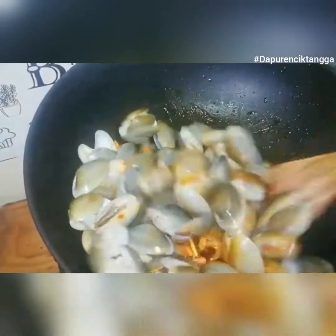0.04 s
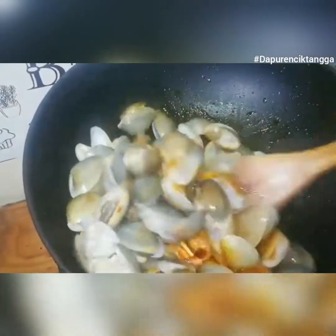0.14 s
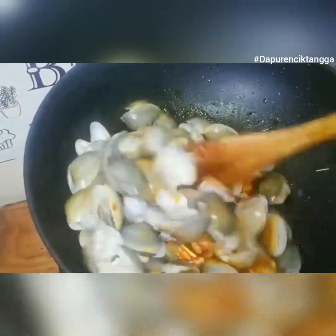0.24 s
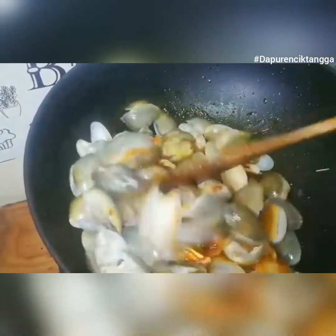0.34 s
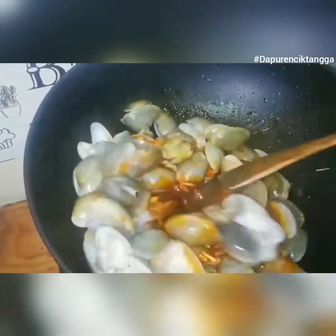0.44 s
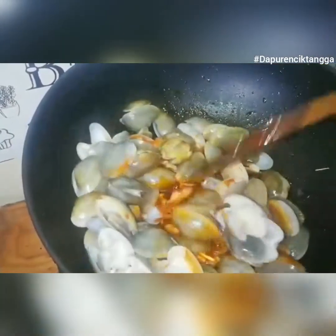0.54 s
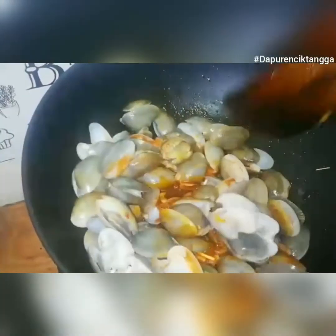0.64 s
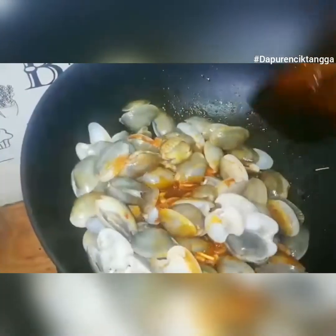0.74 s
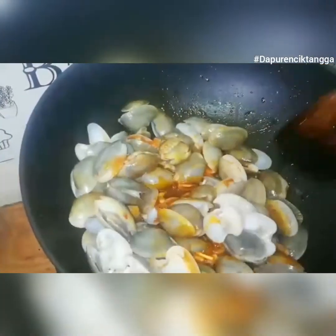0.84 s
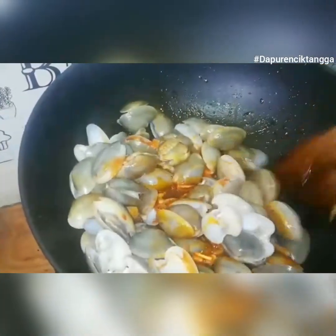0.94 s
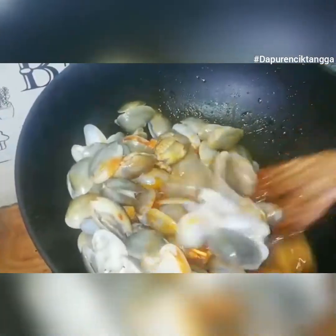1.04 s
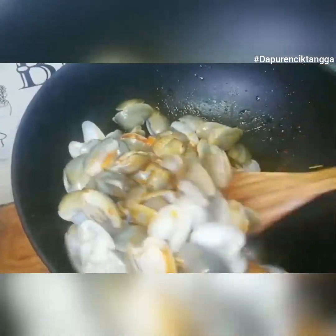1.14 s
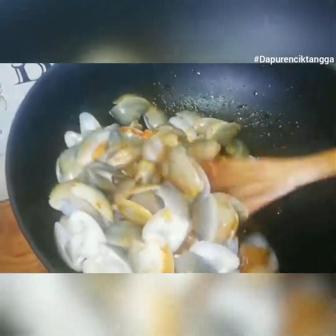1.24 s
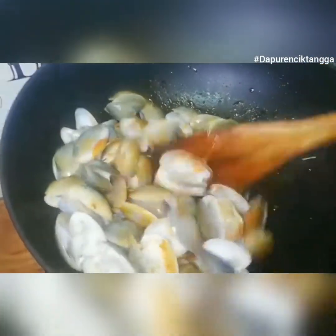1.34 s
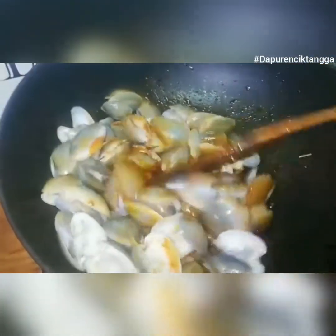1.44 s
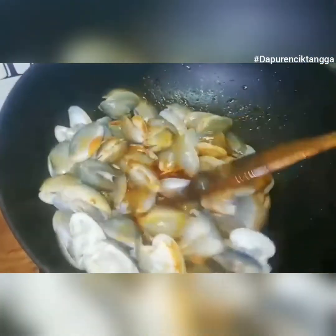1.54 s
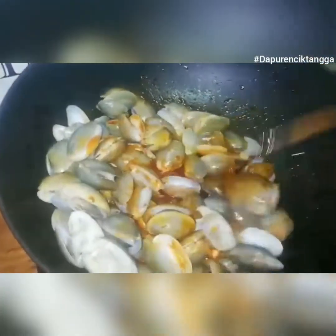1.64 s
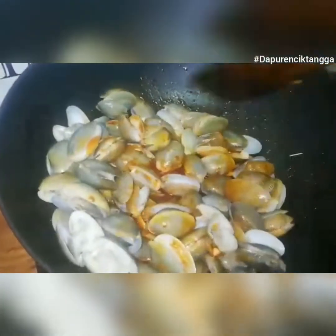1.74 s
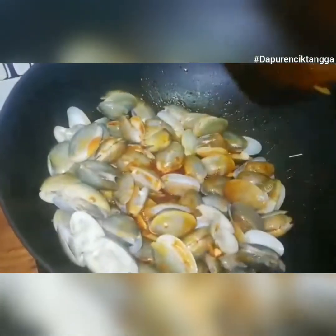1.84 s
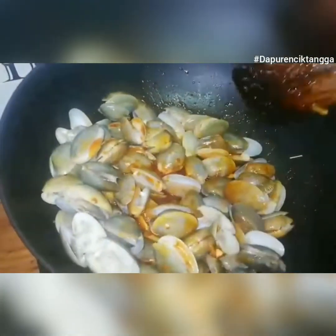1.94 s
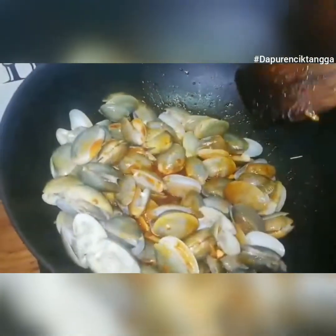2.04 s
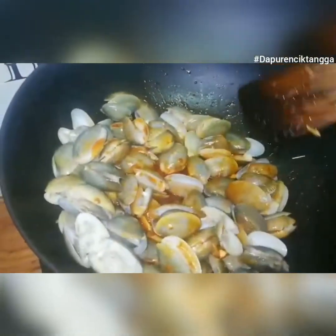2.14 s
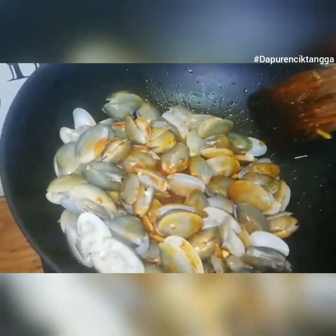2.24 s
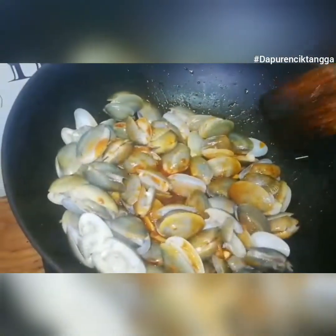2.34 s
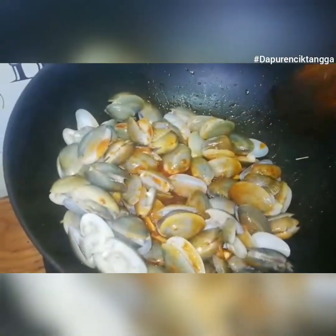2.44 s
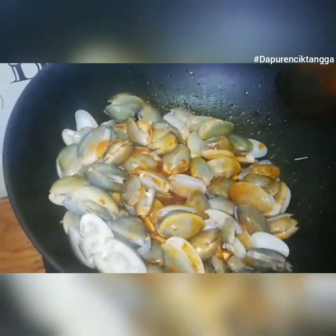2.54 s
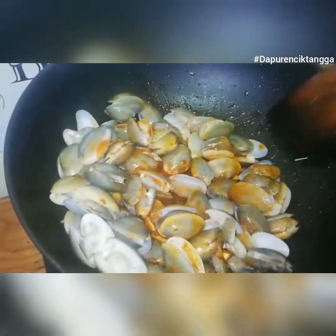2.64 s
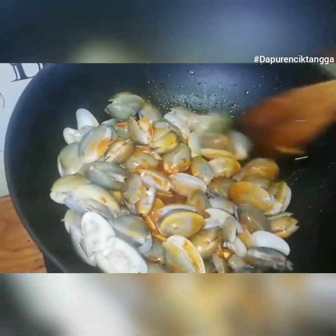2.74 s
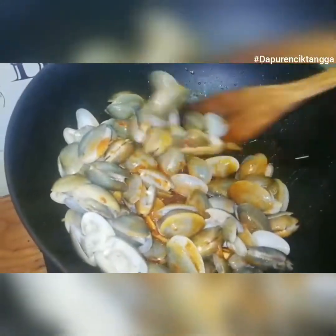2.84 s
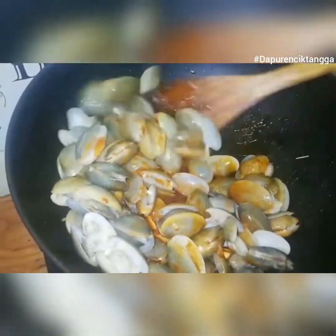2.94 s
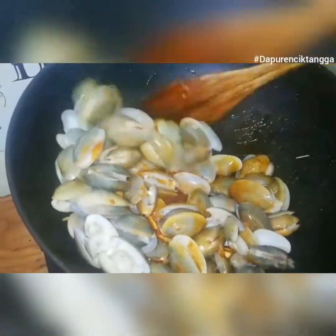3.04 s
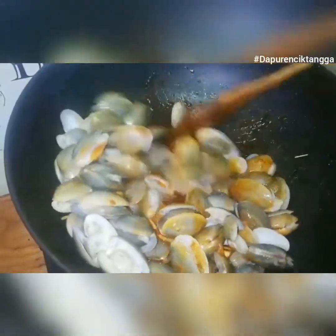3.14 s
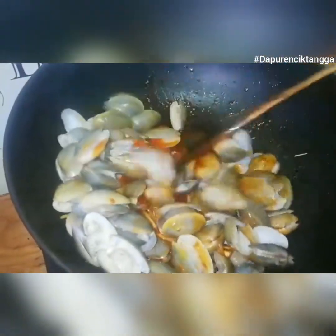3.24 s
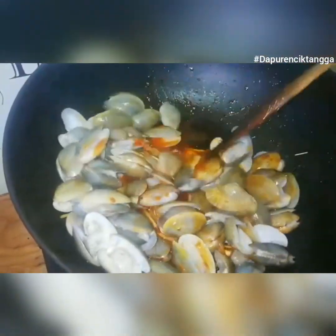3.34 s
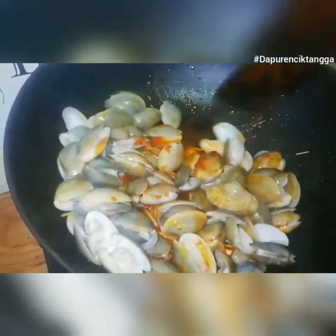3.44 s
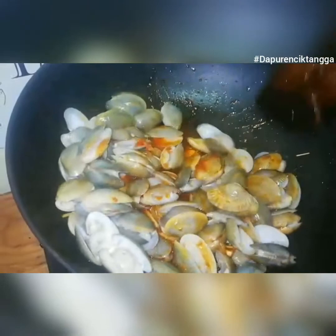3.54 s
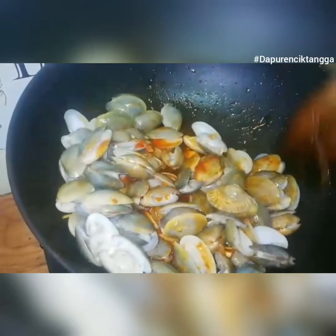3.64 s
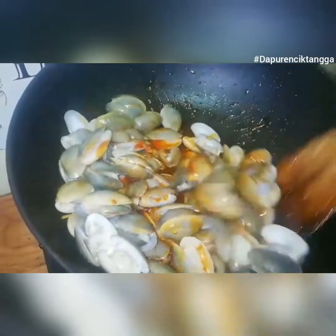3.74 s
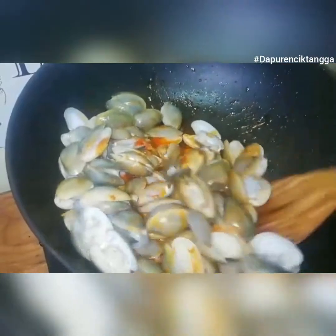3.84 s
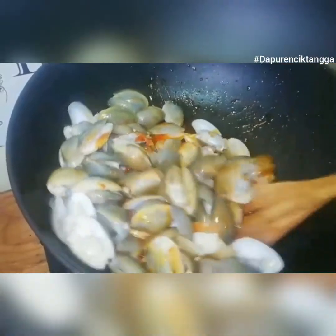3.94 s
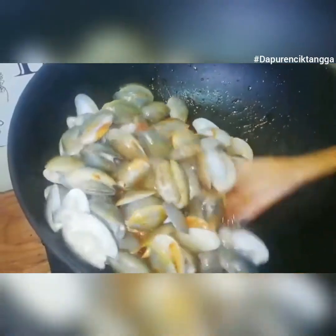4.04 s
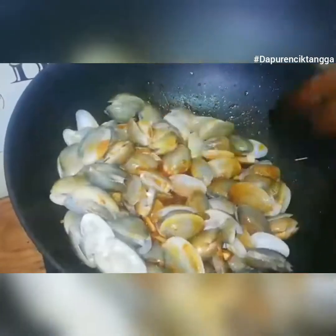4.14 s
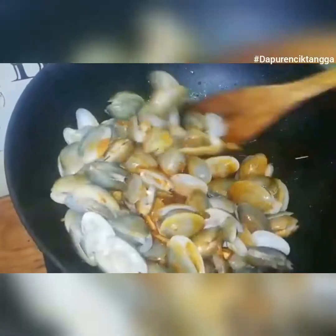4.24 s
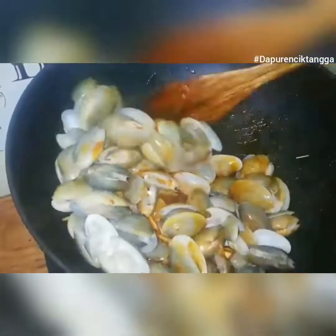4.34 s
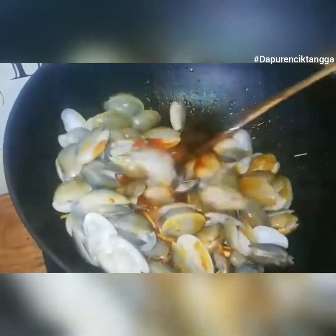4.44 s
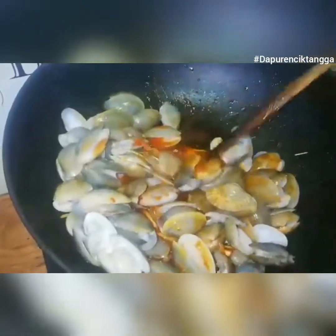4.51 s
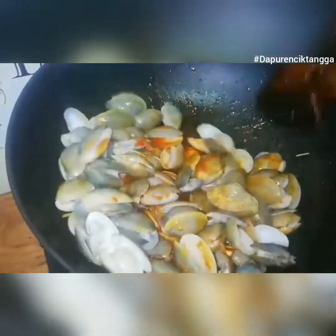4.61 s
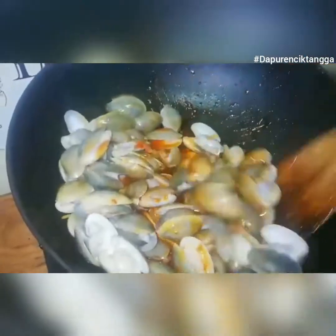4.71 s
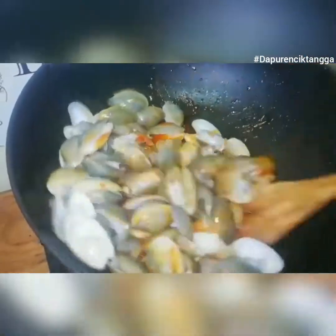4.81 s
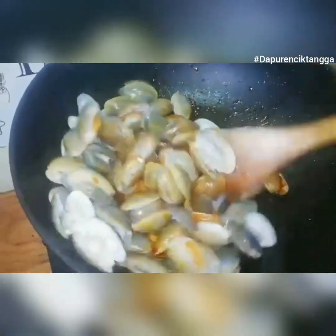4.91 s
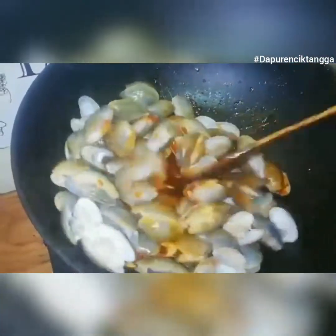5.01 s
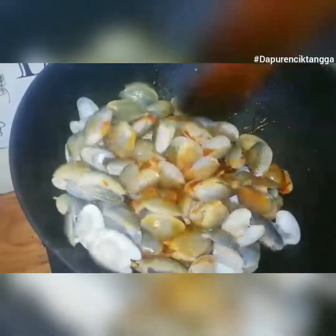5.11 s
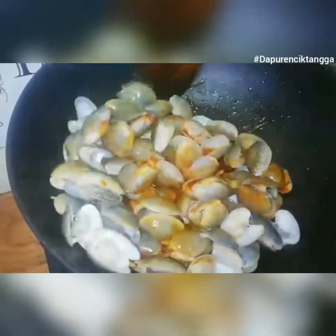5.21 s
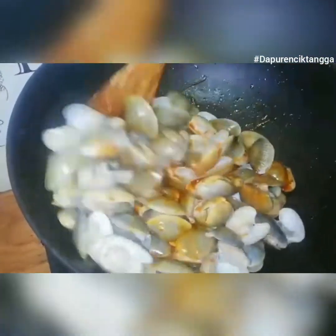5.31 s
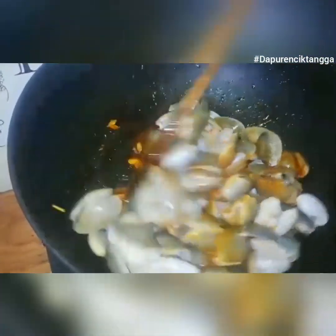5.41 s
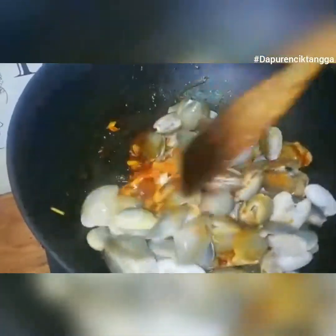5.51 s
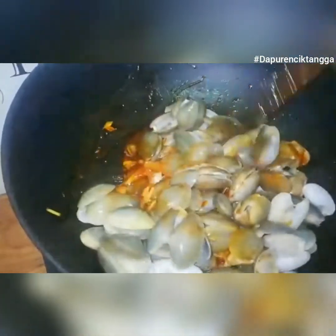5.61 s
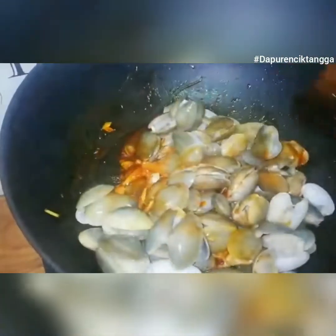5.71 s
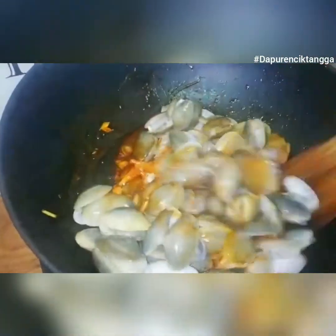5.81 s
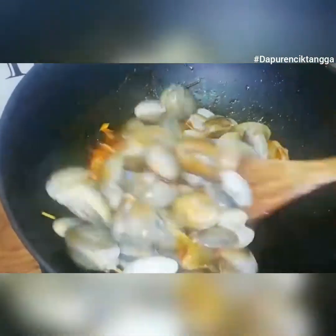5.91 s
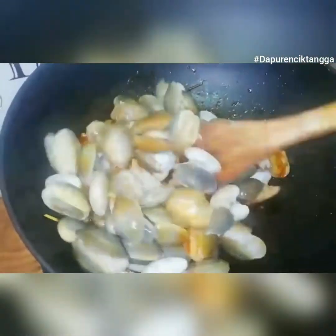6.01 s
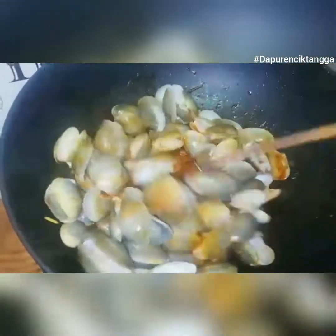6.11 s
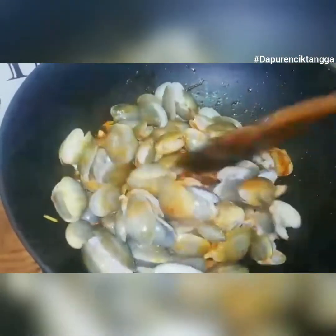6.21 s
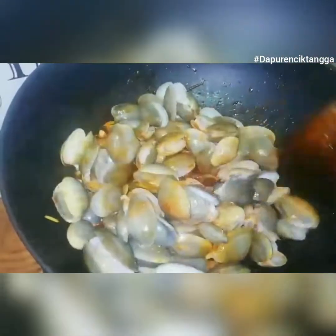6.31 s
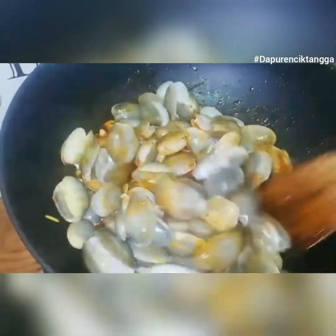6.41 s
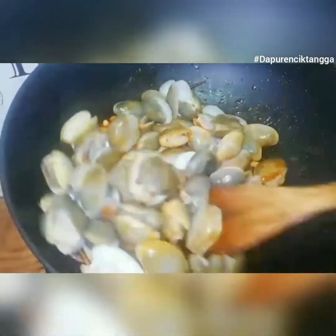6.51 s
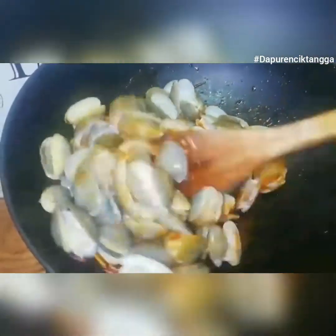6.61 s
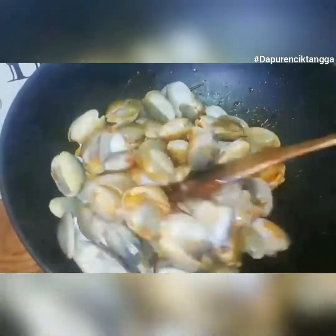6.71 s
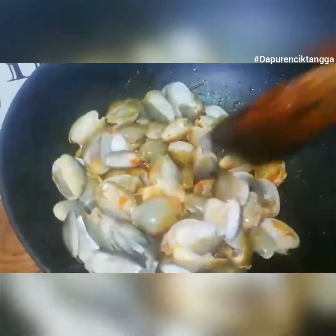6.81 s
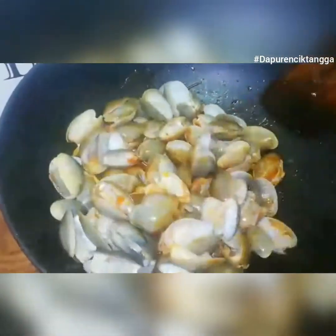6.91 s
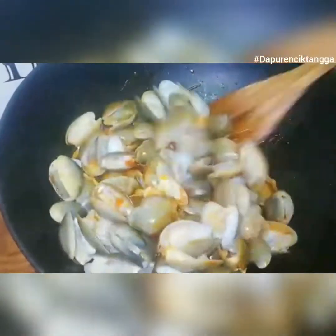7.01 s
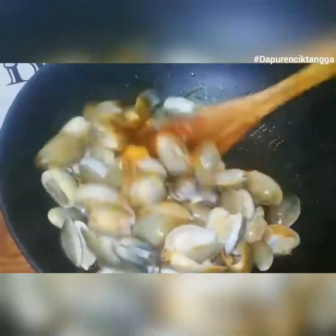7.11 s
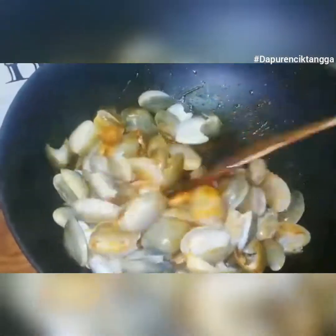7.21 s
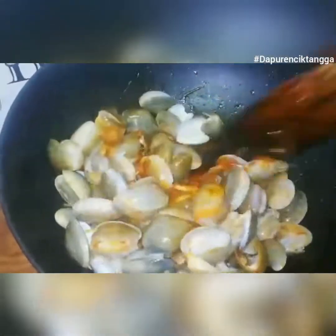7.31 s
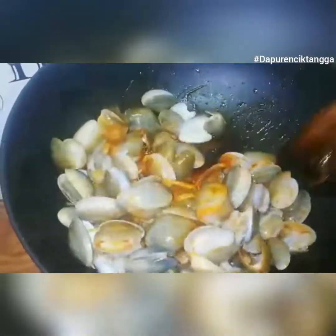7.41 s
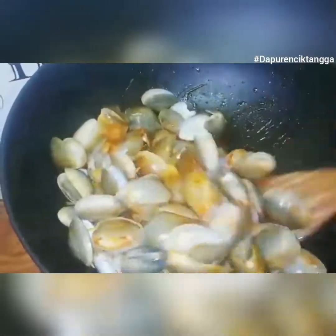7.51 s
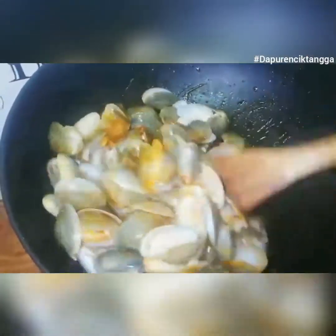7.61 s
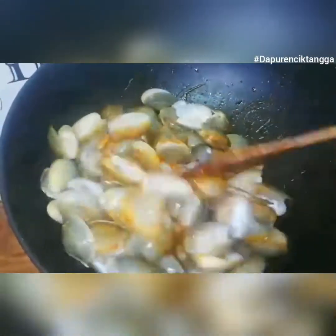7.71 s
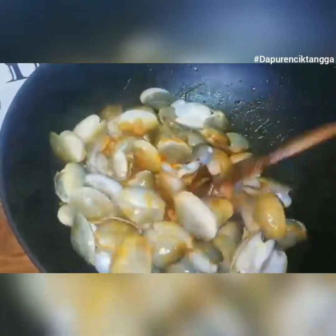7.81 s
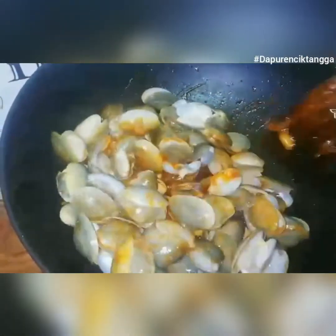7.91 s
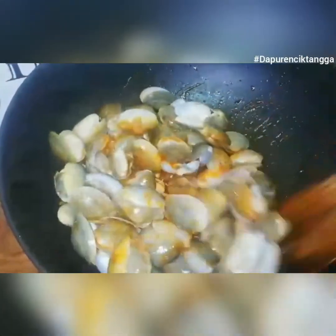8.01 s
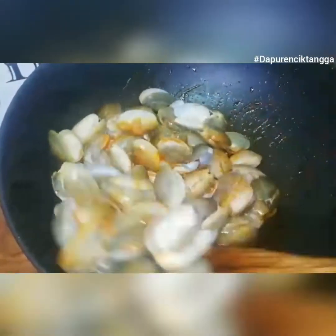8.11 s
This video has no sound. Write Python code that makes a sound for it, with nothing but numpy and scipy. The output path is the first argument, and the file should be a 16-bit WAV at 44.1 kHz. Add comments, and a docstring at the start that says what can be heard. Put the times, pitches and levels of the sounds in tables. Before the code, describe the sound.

Dense, bright clatter of clam shells stirred in bursts with a wooden spatula in a steel wok, with dull knocks and a brief lull.

```python
"""Quiet kitchen: clams in their shells are turned over in a steel wok with a wooden spatula, close to two microphones.
The heap rattles as a dense clatter of short shell modes, with louder clacks and two-tone clinks.
Wood knocks ring the wok's modes; the dragged spatula shakes its low modes by random slips.
Sparse taps make the room. Shaped noise hums behind, a far motor of two partials fades,
and one puff of low noise brushes the microphones."""
import sys
import numpy as np
from scipy import signal
from scipy.fft import rfft, irfft
from scipy.io import wavfile
from scipy.ndimage import uniform_filter1d

SR = 44100
rng = np.random.default_rng(int(sys.argv[2]) if len(sys.argv) > 2 else 0)


def ratio_of_db(decibels):
    """Turn decibels (scalar or array-like) into linear amplitude factors; 0 dB maps to 1."""
    return 10 ** (np.asarray(decibels, float) / 20)


def int16_out(signal):
    """Quantize to a 16-bit WAV file."""
    q = np.round(np.clip(np.atleast_2d(signal).T, -1, 1) * 32767)
    wavfile.write(sys.argv[1], SR, q.astype(np.int16))


N = 359410

# wok modes, first five the boom of the whole bowl: f/Hz, base level/dB, unloaded t60/s
WOK_MODES = [(196, -10.5, 0.23), (221.8, -3, 0.51), (258.7, -9, 0.24), (310.2, 6, 0.08),
             (407.3, -0.5, 0.11), (750, -5, 0.026), (998, -17.5, 0.1), (1210, -10, 0.041),
             (1550, -6.5, 0.036), (2102, -16, 0.17), (2641, -18.5, 0.2)]
# likeness of the two microphones: f/Hz, left-right likeness [0..1]
LIKENESS = [(30, 0.98), (100, 0.99), (200, 0.93), (400, 0.26), (650, 0.27), (1400, 0.5), (3000, 0.3)]


def evened(x):
    """Scales to rms 1."""
    return x / np.sqrt(np.mean(x ** 2) + 1e-20)


def read(points, hz):
    """Reads a spectrum table on a log-frequency axis."""
    f, value = np.transpose(points)
    return np.interp(np.log(hz + 1), np.log(f + 1), value)


def add(mix, start_s, sound):
    """Mixes a two-channel sound in at start_s."""
    part = mix[:, round(start_s * SR):][:, :sound.shape[1]]
    part += sound[:, :part.shape[1]]


def surges(rows, rest_db):
    """Gain over time: rows (start s, swell s, settle s, dB) add up in power over a resting level."""
    swell_power, settle_power = 0.56, 1.95
    t = np.arange(0, N + 64, 64) / SR
    power = ratio_of_db(rest_db) ** 2
    for start_s, swell_s, settle_s, db in rows:
        up = np.clip((t - start_s) / swell_s, 0, 1)
        down = np.clip(1 - (t - start_s - swell_s) / settle_s, 0, 1)
        power = power + (ratio_of_db(db) * up ** swell_power * down ** settle_power) ** 2
    return np.interp(np.arange(N) / SR, t, np.sqrt(power))


def ring(hz, db, t60_s, phase, rise_s, length_s=0.028):
    """A sum of dying modes with a soft start; phase, in cycles, has one row a microphone."""
    t = np.arange(int(length_s * SR))[:, None] / SR
    fade = ratio_of_db(db - 60 * t / t60_s) * (1 - np.exp(-t / rise_s)) ** 2
    modes = fade * np.sin(2 * np.pi * (hz * t + phase[:, None]))
    return modes.sum(axis=-1)


def shell(low_hz, high_hz, t60_s, rise_s, narrow_db, count, centre_hz):
    """One collision wakes many short modes, in other phase at each microphone."""
    # shell spectrum: f/Hz, relative level/dB per Hz
    shell_spectrum = [(500, -15.5), (679, -19), (937, -14.5), (1500, -2.5), (2350, 1), (3290, 0.5),
                      (6260, -4), (9550, 0), (11500, -6.5), (15200, -15), (16400, -40)]
    hz = rng.uniform(low_hz, high_hz, count)
    mode_t60_s = t60_s * rng.uniform(0.7, 2.2, count)
    db = read(shell_spectrum, hz) + 1.0 * rng.standard_normal(count)
    db -= np.minimum(narrow_db * np.log2(hz / centre_hz) ** 2, 16.0)  # shell size favours one region
    phase = rng.random(count) + (1 - read(LIKENESS, hz)) * rng.random((2, count))
    return ring(hz, db, mode_t60_s, phase, rise_s)


def chatter(sound, span_s, count):
    """Ribbed shells skid: the collision repeats unevenly for a few ms, strongest near the middle."""
    place, size = rng.random((count, 2)).T
    train = np.zeros(int(span_s * SR) + 1)
    train[(place * span_s * SR).astype(int)] = (size - .5) * np.sin(np.pi * place ** .7) ** 2
    return signal.fftconvolve(sound, train[None] / np.linalg.norm(train), axes=1)


def clatter():
    """Up to hundreds of small collisions a second: rims tick, hollow cups clack, wet shells hiss between."""
    # slides of the heap: start/s, swell/s, settle/s, rim level/dB, cup level relative to rims/dB
    slides = [(0, 0.0009, 0.37, -19, -7), (0.212, 0.22, 0.13, -20.5, -12.5),
              (0.466, 0.0077, 0.31, -32.5, -8.5), (0.971, 0.085, 0.42, -23.5, -9),
              (1.1, 0.11, 0.052, -24, -23), (1.242, 0.027, 0.036, -22.5, -24), (1.3, 0.17, 0.21, -22.5, -9),
              (1.569, 0.017, 0.29, -25, -12.5), (1.71, 0.021, 0.18, -27.5, -16),
              (2.559, 0.0041, 0.97, -49.5, -1.5), (2.751, 0.046, .2, -24.5, -9.5),
              (2.8, .13, 0.14, -22, -12), (3.043, .17, 0.28, -21, -14), (3.4, 0.044, 0.19, -41, -5.5),
              (3.579, 0.021, 0.19, -37, -8), (3.722, 0.01, 0.66, -26, -11), (3.834, 0.077, 0.25, -25, -8),
              (3.952, 0.16, 0.045, -29, -6.5), (4.231, 0.097, 0.11, -22.5, -9.5),
              (4.44, 0.016, 0.19, -21.5, -11), (4.64, 0.041, 0.05, -38, -8), (4.713, 0.11, 0.14, -25, -8.5),
              (4.879, 0.17, 0.047, -25, -6), (5.09, 0.042, 0.019, -35, -4),
              (5.254, 0.09, 0.051, -24.5, -8.5), (5.37, 0.023, 0.45, -26, -14),
              (5.519, 0.085, 0.13, -34, -4.5), (5.65, 0.022, 0.047, -35.5, -21),
              (5.808, 0.069, 0.15, -22.5, -9), (5.966, 0.17, 0.21, -26, -12.5),
              (6.231, 0.068, 1, -34.5, -15), (6.381, 0.09, 0.086, -22.5, -7.5),
              (6.52, 0.17, 0.065, -28.5, -2.5), (6.719, 0.026, 0.12, -31.5, -8),
              (6.83, 0.012, 0.31, -53.5, 3), (7.3, 0.033, 0.51, -49.5, 0), (7.0, 0.052, 0.38, -23, -9.5),
              (7.078, 0.16, 0.11, -25.5, -25), (7.481, 0.067, 0.21, -22.5, -9),
              (7.661, 0.11, 0.22, -27.5, -5.5), (8.012, 0.063, 0.27, -24.5, -8)]
    creep_db, creep_hollow_db = -61, -63.5  # the heap never lies quite still
    grit_db, sparse_power, kinds = -18, .2, 56
    rims = surges([row[:4] for row in slides], creep_db)
    cups = surges([(*row, db + hollow_db) for *row, db, hollow_db in slides], creep_hollow_db)
    busy = (rims / rims.max()) ** sparse_power  # a quieter heap has fewer collisions
    size = ratio_of_db(3.6 * np.minimum(rng.exponential(1, N), 3.2))
    size *= ratio_of_db(2.5 * evened(uniform_filter1d(rng.standard_normal(N), 400)))  # hard hits bunch
    # drifts between large and small shells
    turn = 4.0 * evened(uniform_filter1d(rng.standard_normal(N), 2500))
    which = np.clip(rng.integers(0, kinds, N) + turn, 0, kinds - 1).astype(int)
    draw = rng.random(N)
    grit = ratio_of_db(grit_db) * rng.standard_normal(N)

    def layer(low_hz, high_hz, t60_s, per_s):
        """Collisions of all shell kinds in one band, at most per_s a second."""
        out = np.zeros((2, N))
        hits = grit + size / np.sqrt(busy) * (draw < busy * per_s / SR)
        for k, centre_hz in enumerate(np.geomspace(1.2 * low_hz, .7 * high_hz, kinds)):
            side = ratio_of_db(2.2 * rng.standard_normal() * np.array([[1], [-1]]))
            tap = shell(low_hz, high_hz, t60_s, 0.0006, 8.0, count=48, centre_hz=centre_hz)
            tap = chatter(tap, .008 * rng.random() ** 3 + .0006, count=12)
            kind_hits = (which == k) * hits
            out += signal.oaconvolve(kind_hits[None], side * tap, axes=1)[:, :N]
        return evened(out)

    return rims * layer(2200, 16200, .0035, 650) + cups * layer(480, 2300, .007, 380)


def clacks():
    """A loud shell: rim modes around its own centre, and cup modes, skidding briefly."""
    # single shells that stand out: t/s, mean level/dB, ring centre f/Hz, cup level relative to rim/dB
    clack_rows = [(0.11, -5, 4700, -13.5), (0.1468, -3, 9200, -43), (0.281, -9, 7360, -26),
                  (0.3604, -8, 5100, -7), (0.4265, -10.5, 7500, -8.5), (0.4947, -4, 11400, -20),
                  (0.575, -8.5, 8500, -46), (0.624, -19.5, 3340, -16), (0.9747, -11.5, 7600, -7),
                  (1.004, -12.5, 4960, -8.5), (1.018, -2, 10100, -20), (1.029, -6.5, 11900, -11.5),
                  (1.0559, -3.5, 9600, -21), (1.115, -5, 7300, -13.5), (1.2582, -26, 4700, -27),
                  (1.323, -16, 6300, -4.5), (1.5112, -7.5, 3360, -7), (1.5903, -8.5, 9030, -21),
                  (1.6622, -11, 4980, -22), (1.6788, -8.5, 4530, -19), (1.7218, 1, 6500, -21),
                  (2.728, -29, 2400, 5.5), (2.765, -16, 3360, 2), (2.803, -12, 3530, -7),
                  (2.8222, -3, 6700, -39), (2.9497, -4, 7100, -24), (2.985, -3.5, 9300, -28),
                  (3.035, -11.5, 8900, -35), (3.0503, -19, 5000, -22), (3.076, -13, 8000, -25),
                  (3.109, -14, 9000, -30), (3.195, -12.5, 4670, -5), (3.3062, -11.5, 10760, -28),
                  (3.347, -13.5, 4120, -13), (3.495, -20, 6240, -19), (3.5502, -24, 5600, -28),
                  (3.72, -17.5, 4940, -3), (3.734, -16, 4450, -3.5), (3.7992, -4.5, 9030, -17),
                  (3.8598, -7, 5530, -31), (3.867, -5.5, 8600, -32), (3.9938, -10.5, 9290, -21),
                  (4.0453, -13.5, 4420, -24), (4.137, -15.5, 8230, -9.5), (4.2735, -10, 3900, -7),
                  (4.3686, -11, 5100, -18), (4.424, -9.5, 9900, -16), (4.5827, -14, 2270, -22),
                  (4.613, -22.5, 6260, -29), (4.646, -26, 7040, -18), (4.793, -4, 9020, -36),
                  (4.8656, -11, 6850, -19), (4.8914, -10.5, 4430, -9), (5.3084, -6.5, 4420, -11),
                  (5.671, -12.5, 4950, -19), (5.8376, -10, 8540, -24), (5.895, -9.5, 3330, -4),
                  (5.9586, -6.5, 8740, -18), (6.074, -2, 7840, -42), (6.045, -9, 8400, -18),
                  (6.008, -12.5, 7450, -10), (6.1003, -4.5, 5400, -11), (6.269, -14, 5940, -24),
                  (6.3046, -8.5, 8700, -18), (6.7455, -10.5, 4500, -25), (6.791, -18, 7800, -20),
                  (6.969, -9.5, 6530, -17), (7.185, -3, 10300, -24.5), (7.288, -10, 8800, -34),
                  (7.442, -26, 2450, 2), (7.489, -17.5, 6100, -7), (7.693, -11.5, 8600, -7),
                  (7.8603, -20.5, 9000, -19), (7.907, -24, 8650, -8)]
    skid_s = .0028
    out = np.zeros((2, N))
    for s, db, hz, hollow_db in clack_rows:
        rim = shell(2300, 16200, .0035, .0006, 8.0, count=90, centre_hz=hz)
        cup = shell(817, 2244, 0.0079, 0.00036, 0, count=6, centre_hz=hz)
        sound = rim / abs(rim).max() + ratio_of_db(hollow_db) * cup / abs(cup).max()
        skid = chatter(sound, skid_s, count=10)
        skid *= abs(sound).max() / abs(skid).max()
        side_db = 3.5 * rng.standard_normal() * np.array([[1], [-1]])
        add(out, s - skid_s / 5, ratio_of_db(db + side_db) * skid)
    return out


def clinks():
    """A lone shell rings on two clear tones that swell for a moment and die, with a tick of equal peak."""
    # t/s, tone and tick level/dB, main tone f/Hz, second tone f/Hz
    clink_rows = [(0.399, -21, 1020, 1480), (1.9133, -45.5, 3470, 2320), (2.1582, -48, 1320, 2320),
                  (2.34, -48, 2050, 1900), (3.432, -19.5, 2420, 3420), (3.574, -31.5, 2830, 2140),
                  (3.931, -15, 4210, 8770), (5.2351, -18, 2480, 1360), (6.8396, -23.5, 3400, 4400),
                  (6.8386, -29.5, 2650, 5200)]
    out = np.zeros((2, N))
    for s, db, *hz in clink_rows:
        phase = rng.random(2) + 0.3 * rng.random((2, 2))
        tones = ring(np.array(hz), np.array([0, -9.0]), 0.013, phase, 0.0013)
        tick = shell(1670, 12100, 0.014, 0.00088, 1.7, count=40, centre_hz=hz[0])
        add(out, s, ratio_of_db(db) * (tones / abs(tones).max() + tick / abs(tick).max()))
    return out


def knocks():
    """Wood on steel: a dull thud and a wall ring; the boom swells briefly and dies, until the spatula
    digging in damps both wall and boom."""
    # spatula blows: t/s, level/dB, boom relative/dB, boom's two upper modes gain/dB,
    # time until damping/s, two highest wall modes gain/dB
    blows = [(0.894, -18, -6, 2, 0.062, 0), (2.564, -20.5, -15, 6.5, 0.19, -16),
             (3.607, -15.5, -11.5, 0, 0.068, 2), (4.152, -29, -7.5, -16, 0.071, -10),
             (4.671, -24, -3, -2, 0.038, 6), (5.307, -22.5, -20.5, 13, 0.023, 3),
             (5.742, -19, -13.5, 2.5, 0.039, -11.5), (5.813, -36.5, 1.5, 1, 0.05, -7),
             (6.97, -21, -4.5, -9, 0.065, 3), (7.44, -27.5, -7, 6, 0.037, 9)]
    length_s = .4
    hz, mode_db, t60_s = np.transpose(WOK_MODES)
    out, t = np.zeros((2, N)), np.arange(int(length_s * SR)) / SR
    for s, db, boom_db, upper_db, free_s, long_db in blows:
        phase = rng.random(len(hz)) + rng.random((2, len(hz))) * (1 - read(LIKENESS, hz))
        spot_db = mode_db + 2.2 * rng.standard_normal(len(hz))  # each blow lands on another spot
        spot_db[-2:] += long_db
        wall = ring(hz[5:], spot_db[5:], t60_s[5:], phase[:, 5:], 0.0006, length_s)
        bowl_db = mode_db[:5] + upper_db * (np.arange(5) > 2)
        boom = ring(hz[:5], bowl_db, t60_s[:5], phase[:, :5], 0.011, length_s)
        damping = ratio_of_db(-np.clip((t - free_s) * 1500, 0, 30))
        # the ring wavers unevenly in level
        waver = ratio_of_db(3.0 * evened(uniform_filter1d(rng.standard_normal(len(t)), 250)))
        thud = shell(455, 5220, 0.016, 0.0012, 5.8, count=70, centre_hz=1200)
        edge_tick = shell(2500, 10000, .004, .0003, 0, count=40, centre_hz=5000)  # spatula edge
        add(out, s, ratio_of_db(db - 3.5) * thud / abs(thud).max())
        add(out, s, damping * waver * (ratio_of_db(db) * wall + ratio_of_db(db + boom_db) * boom))
        add(out, s, ratio_of_db(db - 10.5) * edge_tick / abs(edge_tick).max())
    return out


def scrape():
    """Uneven slips of wood on steel shake the bowl's low modes, damped by the load."""
    # drags of the spatula edge: start/s, length/s, slip level/dB
    drags = [(0, 0.2, -24), (0.322, 0.18, -18), (0.902, 1, -30), (2.804, 0.23, -21.5), (3.61, 0.36, -29),
             (4.004, 0.23, -24.5), (4.216, 0.18, -21.5), (4.807, 0.51, -31), (5.766, 0.26, -25.5),
             (6.085, 0.18, -32), (6.33, 0.63, -29.5), (6.938, 0.52, -31.5), (7.443, 0.4, -27.5),
             (7.977, 0.15, -27.5)]
    swell_share, rest_db, slips_per_s = 0.33, -47, 240
    hz, db, t60_s = np.transpose(WOK_MODES[:5])
    rows = [(s, swell_share * length_s, (1 - swell_share) * length_s, drag_db)
            for s, length_s, drag_db in drags]
    slips = rng.standard_normal(N) * (rng.random(N) < slips_per_s / SR) * surges(rows, rest_db)
    drag_mode_db = db + (13.0, 0.45, -8.0, 6.5, 11.0)
    phase = rng.random(5) + 0.16 * rng.random((2, 5))
    bowl = ring(hz, drag_mode_db, 0.45 * t60_s, phase, 0.00074, length_s=.3)
    return signal.oaconvolve(slips[None], bowl / np.linalg.norm(bowl[0]), axes=1)[:, :N]


def kitchen(x):
    """Room: sparse taps of random sign, one in every 20 samples, each band dying at its own speed."""
    # f/Hz, t60/s
    room_t60 = [(300, 0.63), (1500, 0.17), (5000, 0.13), (12000, 0.052)]
    taps = np.zeros((2, SR // 2))
    start = np.arange(60, SR // 2 - 20, 20)
    at = start + rng.integers(0, 20, (2, len(start)))
    np.put_along_axis(taps, at, rng.choice([-1., 1.], at.shape), axis=1)
    hz, t, z = signal.stft(taps, SR, nperseg=256)
    same = np.clip(read(LIKENESS, hz), 0, 1)[:, None]  # long waves reach both microphones alike
    z[1] = same * z[0] + np.sqrt(1 - same ** 2) * z[1]
    fade = ratio_of_db(-60 * t / read(room_t60, hz)[:, None])
    tail = signal.istft(z * fade, SR, nperseg=256)[1]
    return signal.fftconvolve(x, tail / np.linalg.norm(tail[0]), axes=1)[:, :N]


def hum():
    """Kitchen air: shaped noise, nearly mono in the bass, its deep rumble wavering, with a faint whistle."""
    # air spectrum: f/Hz, relative level/dB per Hz
    air_spectrum = [(20, 0), (100, -5), (300, -18), (560, -26), (1000, -26), (2000, -23.5), (3000, -31),
                    (9500, -33), (13000, -41), (16400, -54)]
    # whistle band: centre f/Hz, half-width to 1/e/Hz, level/dB
    whine_hz, whine_width_hz, whine_db = (5480, 70, -76)
    air_db = -54
    frames, hz = N // 512 + 5, np.fft.rfftfreq(2048, 1 / SR)
    a, b, c, d = rng.standard_normal((frames, 1025, 4)).T
    same = np.clip(read(LIKENESS, hz), -1, 1)[:, None]
    left = a + 1j * b
    z = np.array([left, same * left + np.sqrt(1 - same ** 2) * (c + 1j * d)])
    lumps = evened(uniform_filter1d(rng.standard_normal(frames), 12))
    z *= ratio_of_db(3.5 * lumps / (1 + (hz[:, None] / 120) ** 2))

    def shaped(gain):
        noise = signal.istft(z * gain[:, None], nperseg=2048, noverlap=1536)[1]
        return evened(noise[:, :N])

    air = shaped(ratio_of_db(read(air_spectrum, hz)))
    whine = shaped(np.exp(-((hz - whine_hz) / whine_width_hz) ** 2))
    return ratio_of_db(air_db) * air + ratio_of_db(whine_db) * whine


def drone():
    """A far motor: two partials wavering together, fading away unevenly."""
    # f/Hz, rms level before the fade/dB
    motor_partials = [(98, -63), (193, -65)]
    # t/s, gain/dB
    motor_fade = [(0, -1.5), (1.5, -6.5), (3.8, -2), (4.8, -24)]
    t = np.arange(N) / SR
    waver = np.cumsum(1 + 0.01 * evened(uniform_filter1d(rng.standard_normal(N), 9000))) / SR
    partials = sum(ratio_of_db(db) * np.sqrt(2) * np.sin(2 * np.pi * hz * waver) for hz, db in motor_partials)
    return ratio_of_db(np.interp(t, *np.transpose(motor_fade))) * partials


def puff():
    """Moving air at both microphones: a lumpy rumble of band-passed noise, alike in both."""
    # t/s, rumble level/dB
    puff_levels = [(2.109, -61), (2.15, -42), (2.25, -37), (2.29, -50)]
    s, db = np.transpose(puff_levels)
    band = signal.butter(3, [28, 100], "bandpass", fs=SR, output="sos")
    rumble = evened(signal.sosfilt(band, rng.standard_normal(N)))
    return ratio_of_db(np.interp(np.arange(N) / SR, s, db, left=-120, right=-120)) * rumble


def scene():
    """Wok sounds with their room, over hum, motor and puff; the walls return little bass."""
    wok = clatter() + clacks() + clinks() + knocks() + scrape()
    thin = signal.sosfilt(signal.butter(1, 500, "highpass", fs=SR, output="sos"), wok)
    room = ratio_of_db(-8.5) * kitchen(thin)
    return wok + room + hum() + drone() + puff()


def low_pass(x):
    """Removes everything above the highest recorded frequency."""
    return signal.sosfilt(signal.butter(12, 16630, fs=SR, output="sos"), x)


def record(dry):
    """Two microphones of unlike colour; peaks clip at full scale."""
    # f/Hz, left-right difference/dB
    mic_colour = [(60, -0.5), (240, 0.5), (950, 0), (3770, 1.5), (15000, -3)]
    tilt_db = read(mic_colour, np.fft.rfftfreq(N, 1 / SR)) / 2 * np.array([[1], [-1]])
    heard = irfft(rfft(dry) * ratio_of_db(tilt_db), N)
    mix = np.clip(heard, -1, 1)
    return low_pass(mix)


dry = scene()
out = record(dry)
int16_out(out)
```